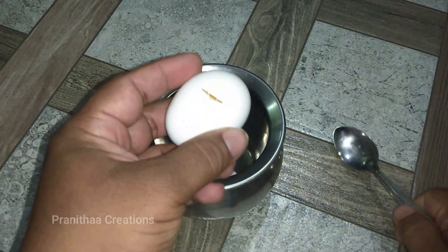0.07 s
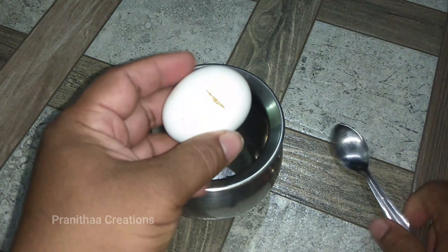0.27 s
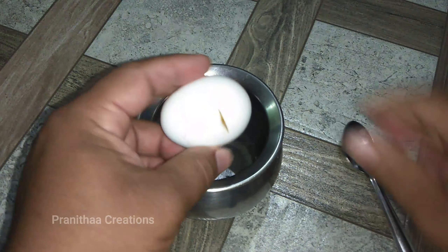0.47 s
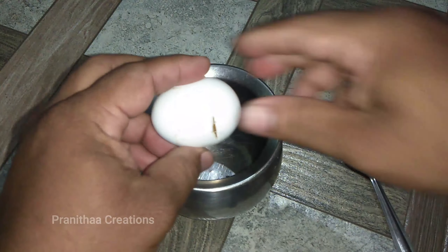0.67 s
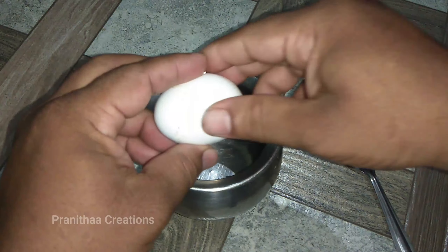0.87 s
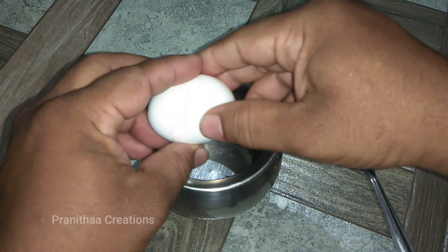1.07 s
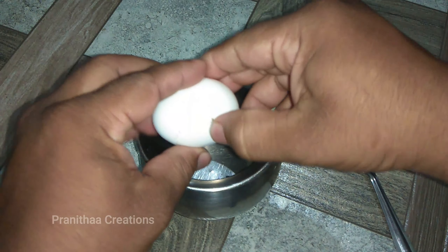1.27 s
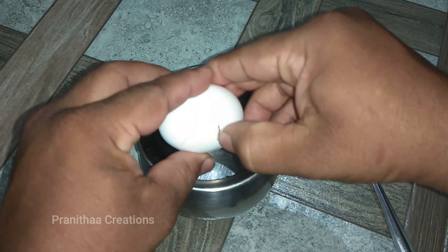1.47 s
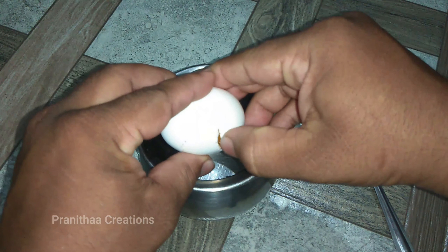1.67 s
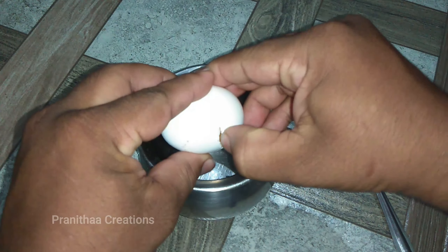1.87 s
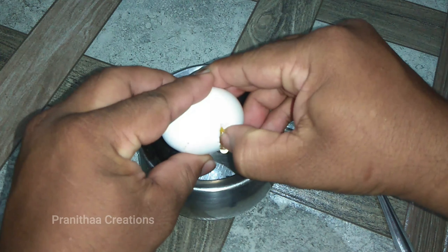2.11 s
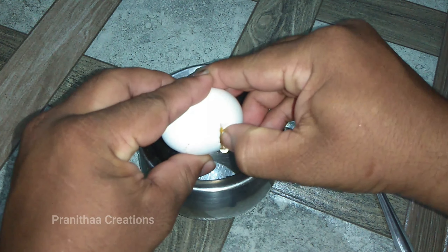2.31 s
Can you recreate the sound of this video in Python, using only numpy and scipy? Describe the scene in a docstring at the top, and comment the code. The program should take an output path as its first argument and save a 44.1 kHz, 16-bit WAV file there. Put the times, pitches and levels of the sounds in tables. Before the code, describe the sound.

A steel spoon clacks against a tiled floor at about 0.2 seconds, then is let go and clatters loudly from 0.4 to 0.8 seconds, ringing as it rocks to rest and briefly overloading the close microphone. Near 1.5 seconds an eggshell ticks faintly under the thumbs, and at 2 seconds it snaps once, quieter than the spoon. A steady hiss fills the small hard room.

```python
"""A small hard room with a tiled floor and a steady hiss, the microphone close in. A steel spoon touches the
tile while still held, is let go, and bounces and rocks to rest. Every contact clacks and sets the steel
ringing, and the loudest flatten at their peaks. Then thumbs press into an eggshell, which ticks and snaps once."""
import sys
import numpy as np
from scipy import signal
from scipy.fft import rfft, irfft
from scipy.io import wavfile
from scipy.ndimage import uniform_filter1d

SR = 44100
rng = np.random.default_rng(int(sys.argv[2]) if len(sys.argv) > 2 else 0)


def wav_out(sig):
    """Save sig, one row per channel (or a flat mono array), as 16-bit PCM at SR to the path in sys.argv[1]."""
    wavfile.write(sys.argv[1], SR, np.round(np.clip(np.atleast_2d(sig).T, -1, 1) * 32767).astype(np.int16))


N = 108045


def undb(db):
    """Decibels to gain."""
    return 10 ** (np.asarray(db) / 20)


def decay(start_s, t60_s):
    """A sudden rise, then an exponential fall."""
    age = np.arange(N) / SR - start_s
    return (age >= 0) * np.exp(-np.log(1000) * np.maximum(age, 0) / t60_s)


def noise(spectrum):
    """Noise of unit rms, coloured by rows of freq_hz, level_db."""
    hz, db = np.array(spectrum).T
    bins_hz = np.maximum(np.fft.rfftfreq(N, 1 / SR), 1)
    colour = undb(np.interp(np.log(bins_hz), np.log(hz), db))
    x = irfft(rfft(rng.standard_normal(N)) * colour, N)
    return x / x.std()


def wander(rate_hz):
    """Smooth random motion of unit spread."""
    return noise([(1, 0), (rate_hz, 0), (rate_hz * 4, -60), (rate_hz * 16, -120)])


def room(x, wet_db):
    """The direct sound, with the diffuse echo of tiles and walls just behind it."""
    tail = rng.standard_normal(N) * decay(start_s=0.0046, t60_s=0.49)
    return x + undb(wet_db) * signal.fftconvolve(x, tail / np.linalg.norm(tail))[:N]


# colour of the room tone: freq_hz, level_db
HISS_SPECTRUM = [(10, -58.5), (25, -26), (40, -24.5), (55, -9), (90, -10.5), (125, -5.5), (185, -2.5),
                 (295, -1), (350, -7), (470, -8.5), (620, -8), (920, -10), (1600, -9), (2300, -10.5),
                 (3000, -15), (4100, -15.5), (5500, -23.5), (8200, -22.5), (10400, -36.5), (12500, -41),
                 (15500, -44.5)]
# its slow swell: time_s, level_db
HISS_SWELL = [(0, -39.5), (0.6, -39.5), (1.3, -40.5), (1.599, -38), (1.85, -38.5), (2.45, -38.5)]
def room_hiss():
    """Room tone behind everything, swelling slowly and flickering a little."""
    time_s, level_db = np.array(HISS_SWELL).T
    swell_db = np.interp(np.arange(N) / SR, time_s, level_db)
    return noise(HISS_SPECTRUM) * undb(swell_db + 0.5 * wander(rate_hz=12))


# cracks in the shell: start_s, level_db
SHELL_CRACKS = [(1.4835, -45), (1.5373, -35), (1.994, -36.5), (2.0015, -17), (2.0084, -38.5)]
# colour of a crack: freq_hz, level_db
SHELL_SPECTRUM = [(400, -24), (1500, -5.5), (2600, -18.5), (3450, 0), (4360, -1), (5800, 4), (7500, -2.5),
                  (9000, -3.5), (11500, -21.5), (15000, -23.5)]
def eggshell():
    """Brittle shell gives under the thumbs: each crack is a burst of noise with a faint tail."""
    envelope = sum(undb(db) * (decay(start, t60_s=0.013) + undb(-16) * decay(start, t60_s=0.097))
                   for start, db in SHELL_CRACKS)
    return envelope * noise(SHELL_SPECTRUM)


# modes of the floor tile: pitch_hz, level_db, t60_s
TILE_MODES = [(673, -3, .16), (841, -1.5, .18), (1120, -12, .15)]
# colour of the thud: freq_hz, level_db
THUD_SPECTRUM = [(20, 0), (50, 27), (110, 1), (300, -33), (900, -32), (4000, -61.5)]
def tile_knock(start_s=0.41, level_db=-33.5):
    """The floor answers a heavy landing with one dull knock and a low thud."""
    age = np.arange(N) / SR - start_s
    knock = sum(undb(level_db + db) * decay(start_s, t60) * np.sin(2 * np.pi * hz * age)
                for hz, db, t60 in TILE_MODES)
    thud = undb(-30.5) * decay(start_s=0.4135, t60_s=0.069) * noise(THUD_SPECTRUM)
    return knock + thud


# the spoon meets the floor, driving the clack and four bands of the ring:
# start_s, low_db, middle_db, high_db, top_db, clack_db, ring_length_ratio
SPOON_CONTACTS = [(0.189, -18, -34, -25, -30, -17.5, 0.41), (0.2019, -19.5, -20.5, -29, -24.5, -15.5, 0.27),
                  (0.2152, -30.5, -33, -31, -23.5, -24, 0.27), (0.3396, -45, -47, -45.5, -62, -28.5, 1),
                  (0.36, -48, -43, -33, -61, -35.5, 0.54), (0.3673, -10, -16.5, -4, -5.5, -4.5, 0.76),
                  (0.3839, -4.5, -7.5, -33.5, -33, -11, 0.5), (0.393, -3, -4.5, -19, -32, -14, 0.97),
                  (0.413, -11.5, -6.5, -12, -9, -5, 0.36), (0.454, -28.5, -17.5, -7, -13, -6.5, 1),
                  (0.493, -14, -9, -8, -21.5, -15.5, 0.63), (0.5076, -8.5, -15.5, -18, -16, -7.5, 1),
                  (0.5278, -32.5, -10.5, -3, -3.5, -7, 0.29), (0.551, -10.5, -5.5, -28, -15, -15, 0.78),
                  (0.569, -34.5, -10, -16.5, -9, -10, .7), (0.5742, -42, -9, -19.5, -23.5, -13.5, 0.79),
                  (0.603, -14.5, -29, -24, -6, -17.5, 0.31), (0.6425, -30, -16.5, -17.5, -25, -20.5, 1),
                  (0.679, -25.5, -25, -11.5, -15, -13, 1), (0.704, -20, -25, -14, -23, -24, 1),
                  (0.728, -47, -34, -9, -21, -19, 0.79), (0.748, -44, -25, -15, -23, -22, 0.72),
                  (0.77, -40, -24, -23.5, -22, -31, 0.46)]
# dense, quickly damped ringing of steel on tile: freq_hz, level_db
CLACK_SPECTRUM = [(300, -26.5), (1000, -23.5), (2000, -16.5), (3000, -8), (4600, -3), (5400, -3.5),
                  (7000, 2), (8400, 7), (9200, -6), (10200, 0), (11400, -20.5), (13000, -14.5),
                  (15500, -16)]
def spoon_clack():
    """A short metallic wash at every contact; the harder the contact, the larger its share of crack."""
    hardest_db = max(db for *_, db, _ in SPOON_CONTACTS)
    energy = np.zeros(N)
    for start, *_, db, _ in SPOON_CONTACTS:
        crack = undb(0.17 * (db - hardest_db)) * decay(start, t60_s=0.017)
        wash = undb(-8.5) * decay(start, t60_s=0.23)
        energy += undb(db) ** 2 * (crack ** 2 + wash ** 2)
    return np.sqrt(energy) * noise(CLACK_SPECTRUM)


# centres of the low, middle, high and top bands: freq_hz
RING_BANDS_HZ = (4600, 6400, 8350, 9850)
# modes of the spoon: pitch_hz
MODE_PITCHES_HZ = (2057, 3427, 4041, 4579, 6239, 6436, 6892, 7386, 8359, 9843, 10356, 12137, 12748, 13701,
                   13896)
# ring of each mode, loose and in the fingers: free_db, held_db, t60_s
MODE_RINGS = [(-29.5, -8.5, 0.82), (-12.5, -2, 0.47), (-24.5, -22.5, 0.87), (0.5, 5, 0.33), (-9, -7.5, .45),
              (-1, -2, .48), (-13, -4, .55), (-11, -12, 0.32), (-0.5, -0.5, 0.33), (0, 3, 0.28),
              (-18.5, -17, 0.29), (-43, -13.5, 0.9), (-10, -9.5, 0.45), (-24, -25.5, .65), (-16, -6.5, .42)]
def spoon_ring(release_s=0.33, jolt_s=0.002, kick_rad=0.6, twin_spread_hz=40, shimmer_db_per_khz=0.2128):
    """Contacts feed the modes and jolt phase and pitch; weak twins beat; rocking shimmers the treble."""
    t = np.arange(N // 2) / SR
    contacts = np.array(SPOON_CONTACTS)
    contacts_so_far = np.searchsorted(np.sort(contacts[:, 0]), t)
    ring = np.zeros(N)
    for hz, (free_db, held_db, t60) in zip(MODE_PITCHES_HZ, MODE_RINGS):
        scatters_db, kick, detune, split = rng.standard_normal((len(contacts) + 1, 4)).T
        energy = np.zeros(len(t))
        for (start, *bands_db, _, length_ratio), scatter_db in zip(contacts, scatters_db):
            onset = int(start * SR)
            mode_db = held_db if start < release_s else free_db
            strike_db = mode_db + np.interp(hz, RING_BANDS_HZ, bands_db) + scatter_db
            fade = np.exp(-np.log(1000) / (t60 * length_ratio) * t[:len(t) - onset])
            energy[onset:] += (undb(strike_db) * fade) ** 2
        jolt = uniform_filter1d(kick_rad * np.cumsum(kick)[contacts_so_far], int(jolt_s * SR))
        pitch_hz = hz * (1 + 0.0005 * detune[contacts_so_far])
        phase = 2 * np.pi * np.cumsum(pitch_hz) / SR + jolt
        beat = 2 * np.pi * np.cumsum(twin_spread_hz * split[contacts_so_far]) / SR
        twin = undb(-11) * np.sin(phase + beat)
        envelope = uniform_filter1d(np.sqrt(energy), int(jolt_s * SR / 2))
        shimmer = undb(shimmer_db_per_khz * hz / 1000 * wander(rate_hz=61)[:len(t)])
        ring[:len(t)] += envelope * shimmer * (np.sin(phase) + twin)
    return ring


def scene():
    """Spoon, then egg, over the room tone, as they reach one close microphone."""
    ring = room(spoon_ring(), wet_db=-12)
    impacts = room(spoon_clack() + tile_knock(), wet_db=-9)
    egg = room(eggshell(), wet_db=-11)
    return (ring + impacts + egg + room_hiss())[None]


def record(dry):
    """The loudest peaks flatten, slightly lopsided, and the top is cut."""
    knee, bias, top_hz = 6, 0.01, 15650
    clipped = dry / (1 + np.abs(dry) ** knee) ** (1 / knee)
    low_cut = signal.butter(1, 30, "high", fs=SR, output="sos")
    even_harmonics = signal.sosfilt(low_cut, clipped ** 2)
    top_cut = signal.ellip(8, 0.2, 70, top_hz, fs=SR, output="sos")
    return signal.sosfilt(top_cut, clipped + bias * even_harmonics)


dry = scene()
out = record(dry)
wav_out(out)
```